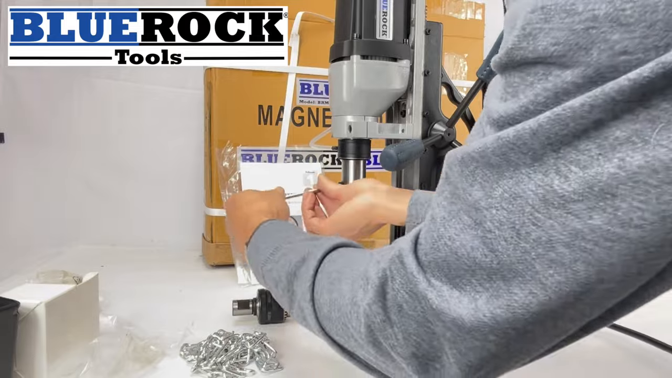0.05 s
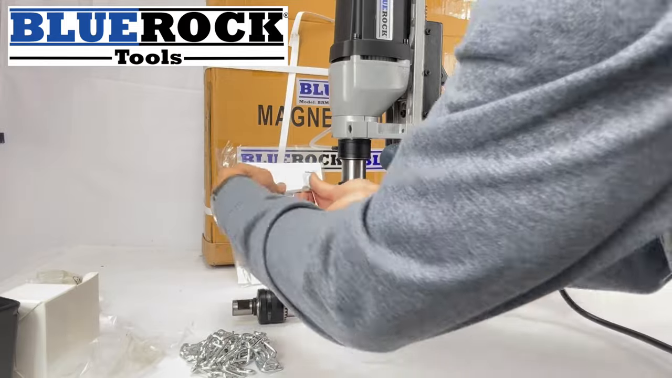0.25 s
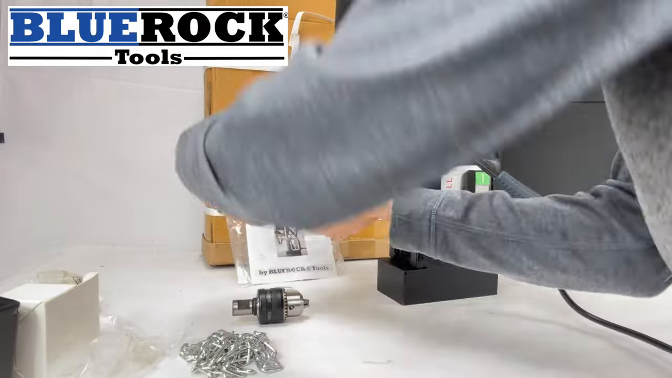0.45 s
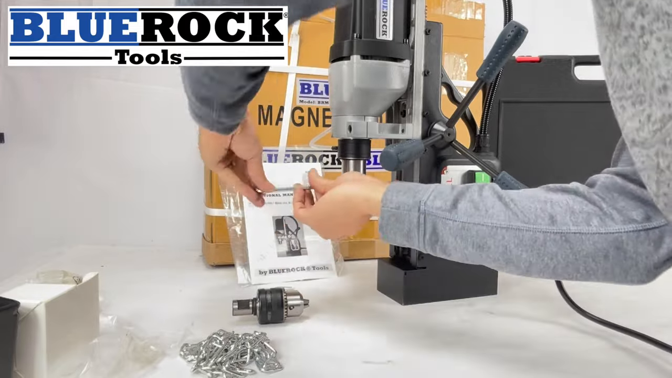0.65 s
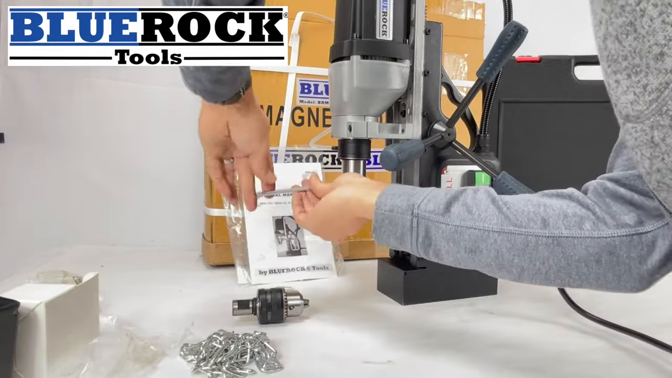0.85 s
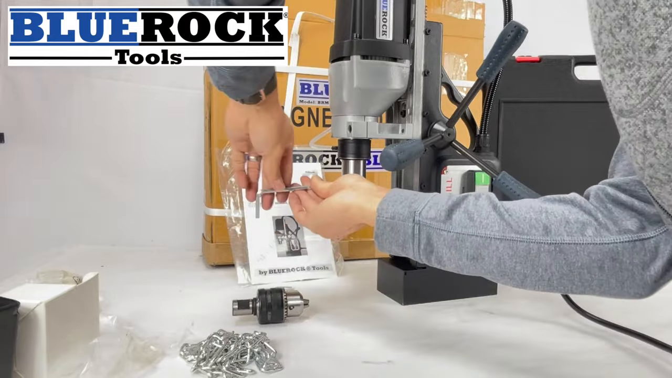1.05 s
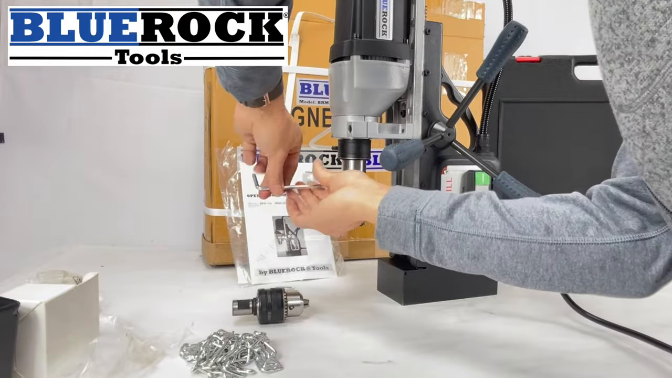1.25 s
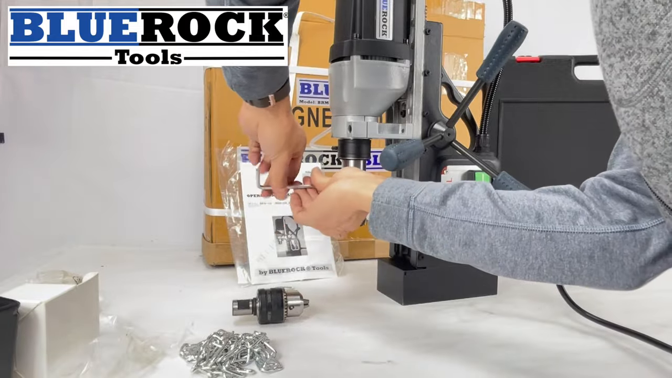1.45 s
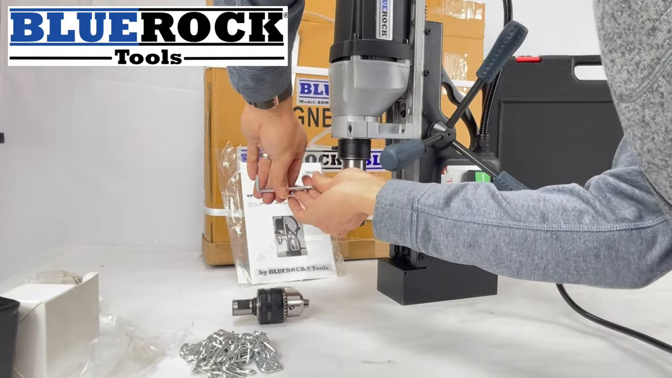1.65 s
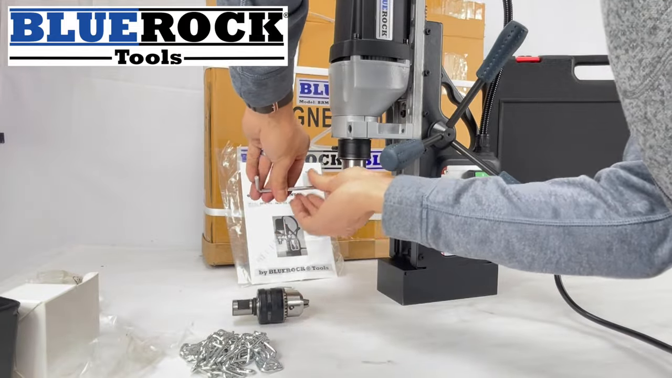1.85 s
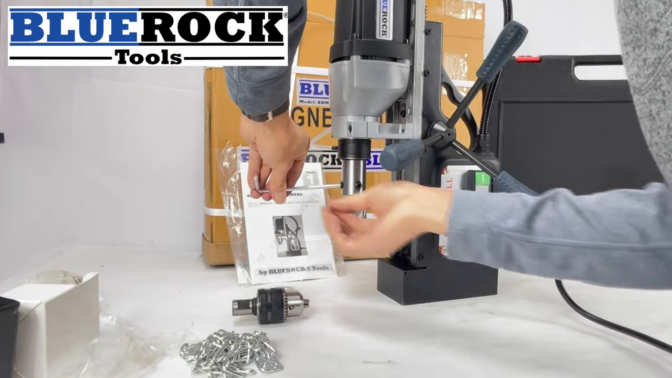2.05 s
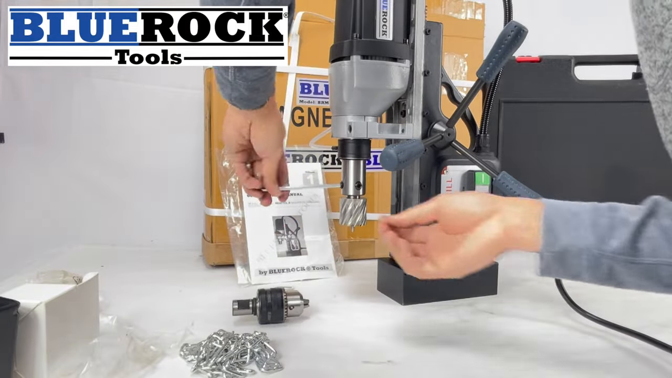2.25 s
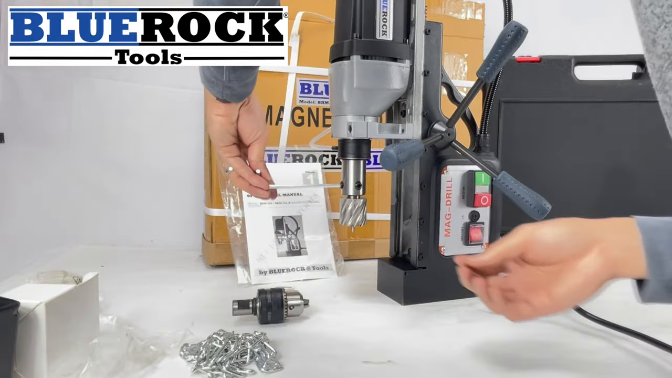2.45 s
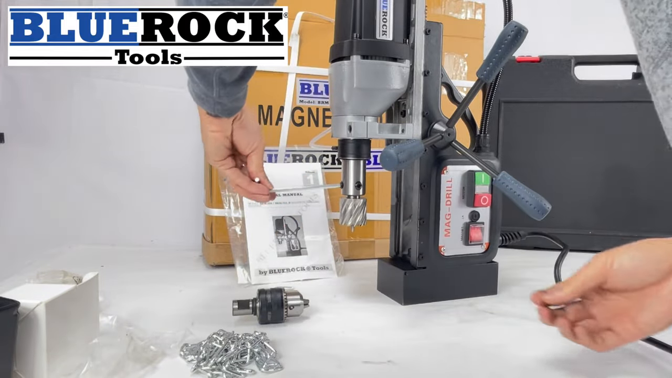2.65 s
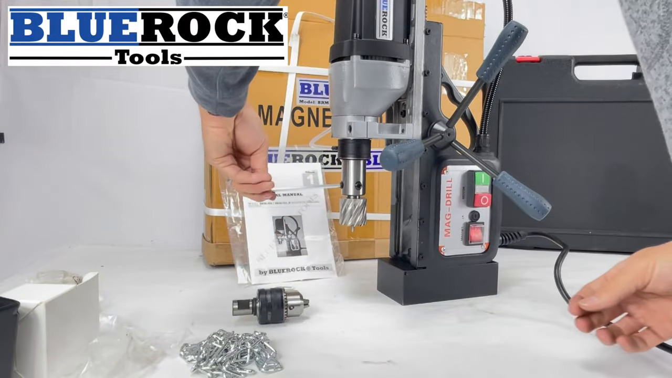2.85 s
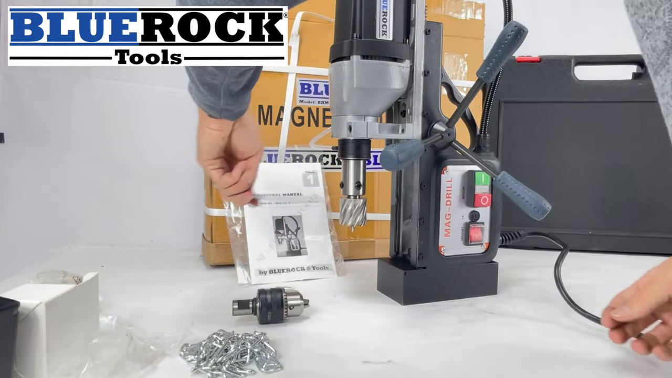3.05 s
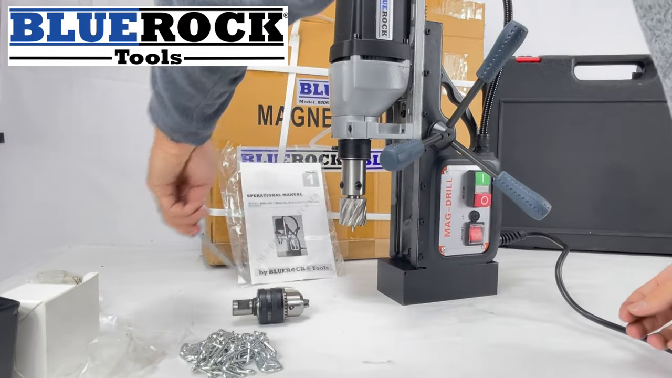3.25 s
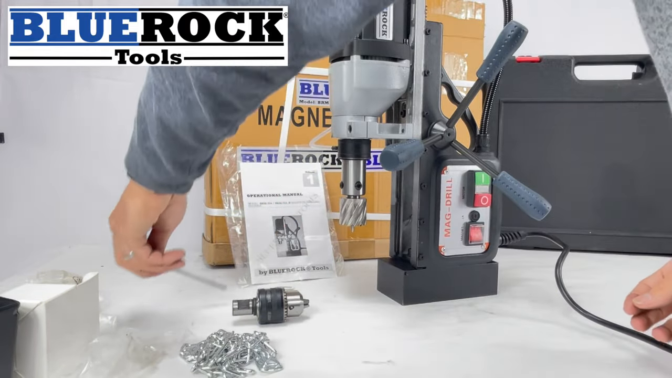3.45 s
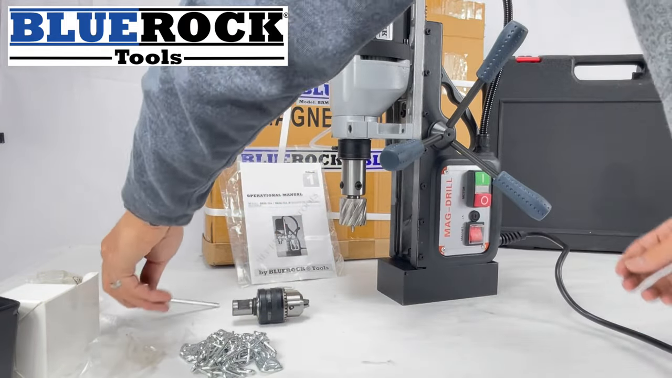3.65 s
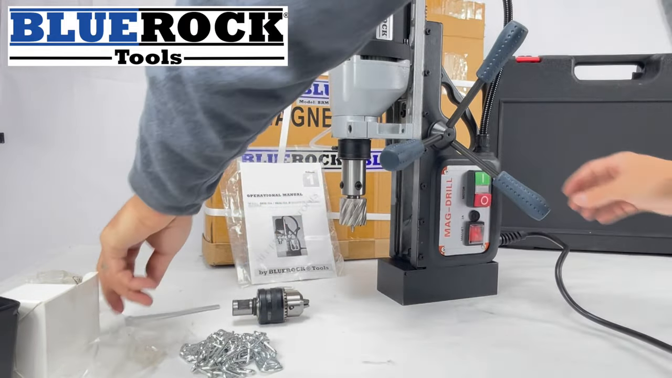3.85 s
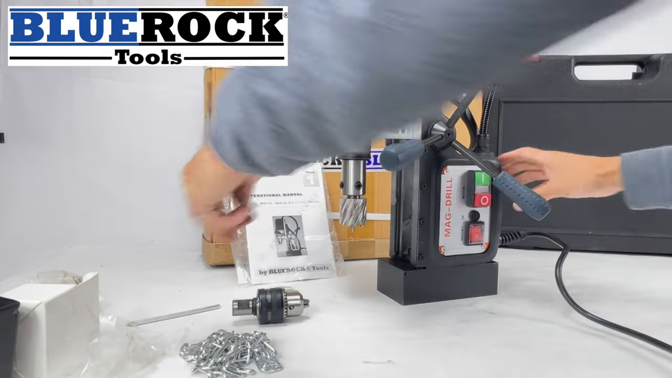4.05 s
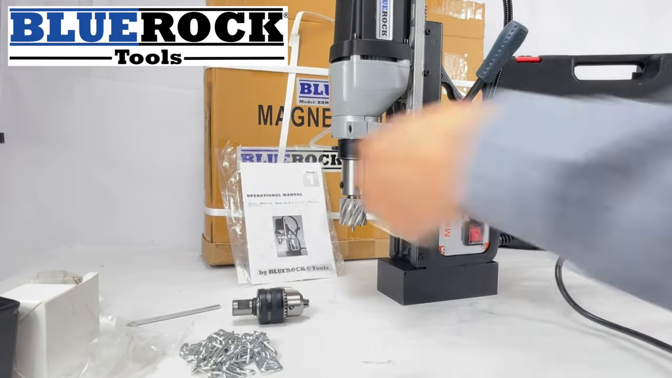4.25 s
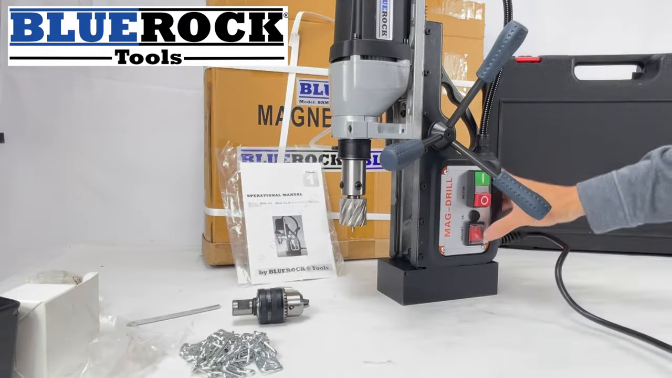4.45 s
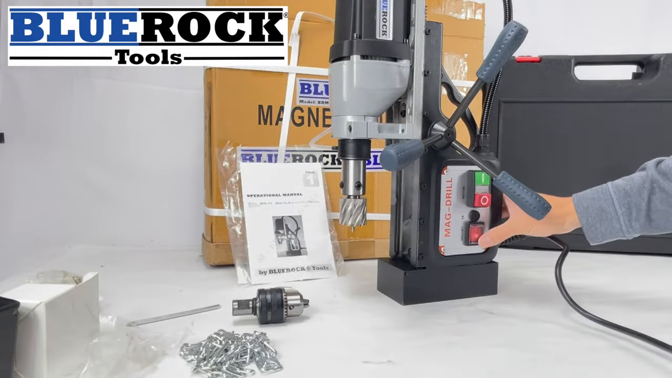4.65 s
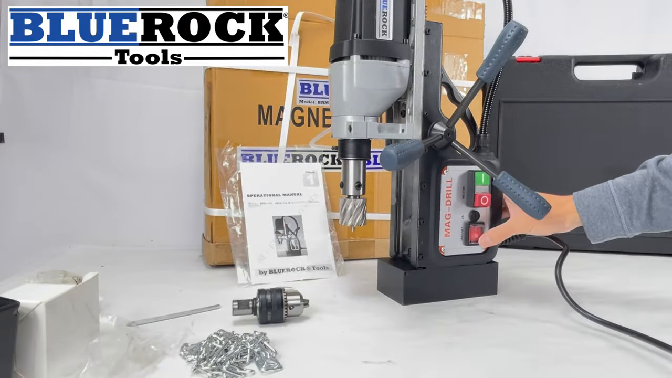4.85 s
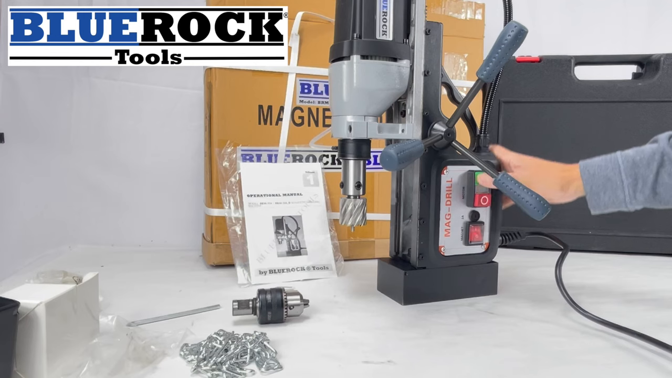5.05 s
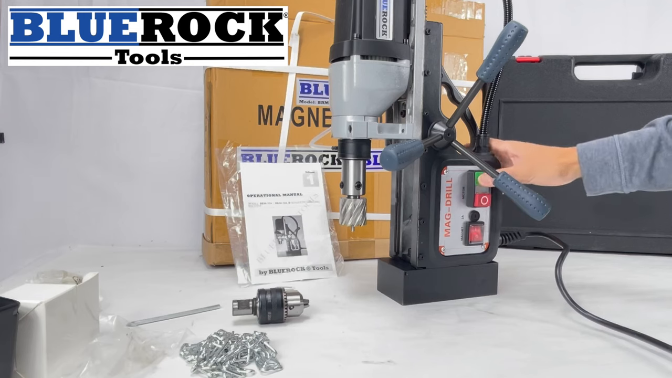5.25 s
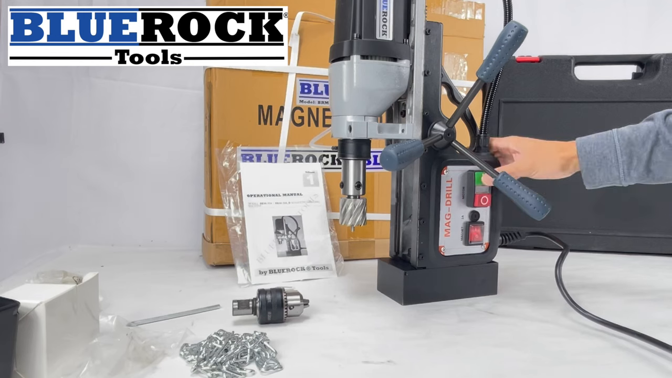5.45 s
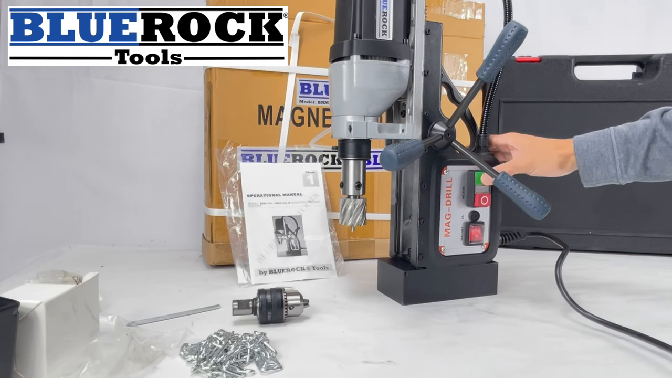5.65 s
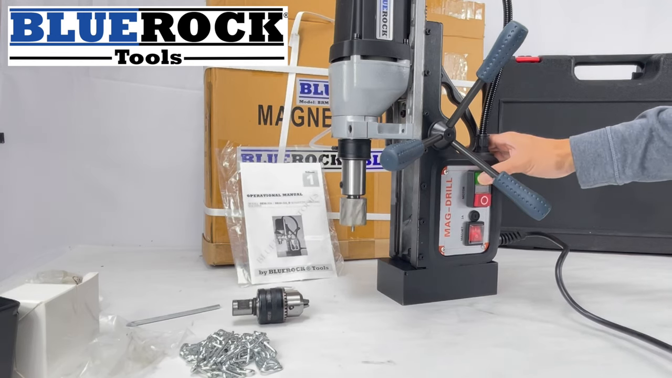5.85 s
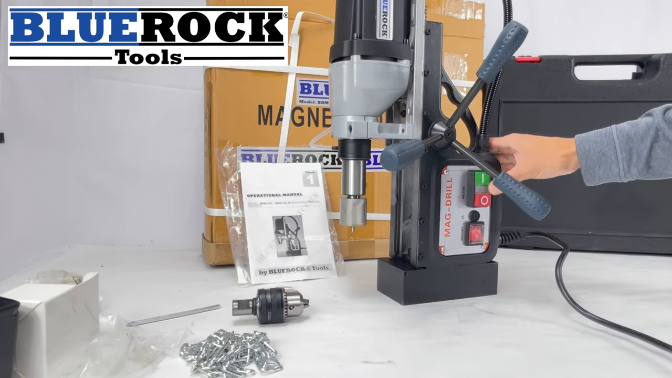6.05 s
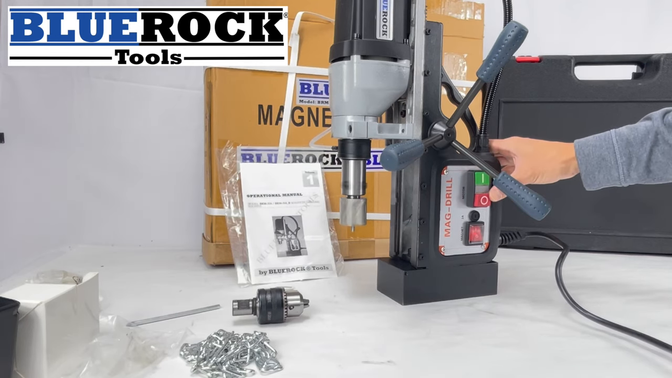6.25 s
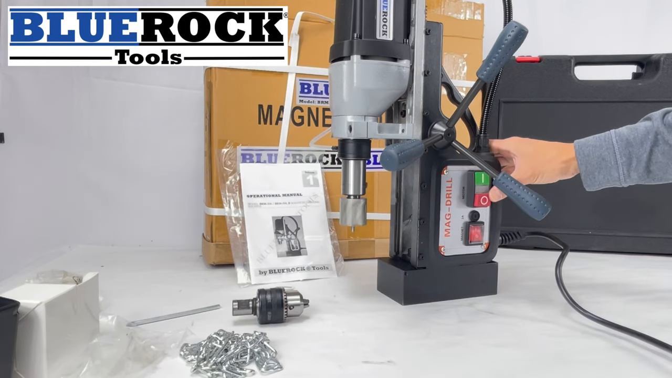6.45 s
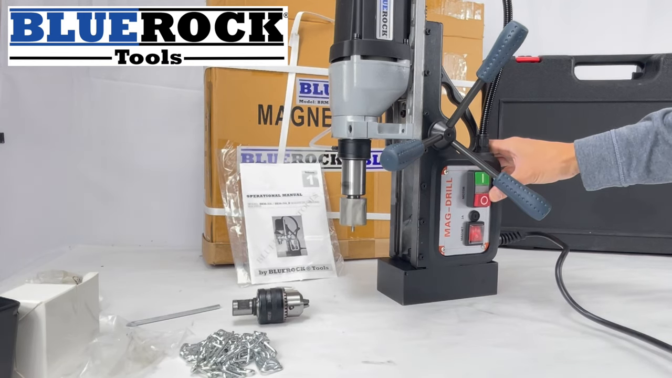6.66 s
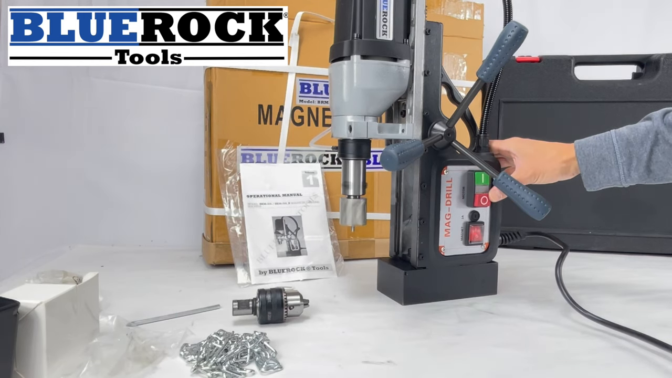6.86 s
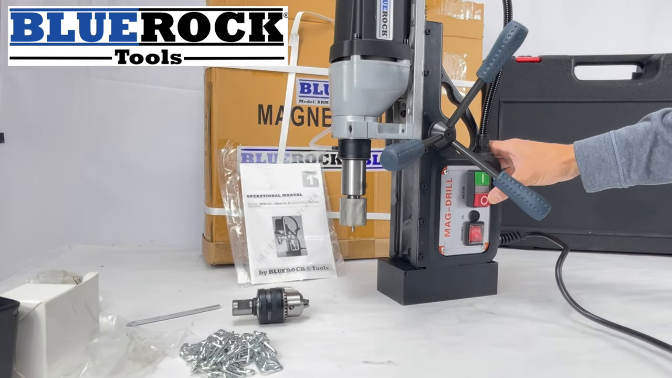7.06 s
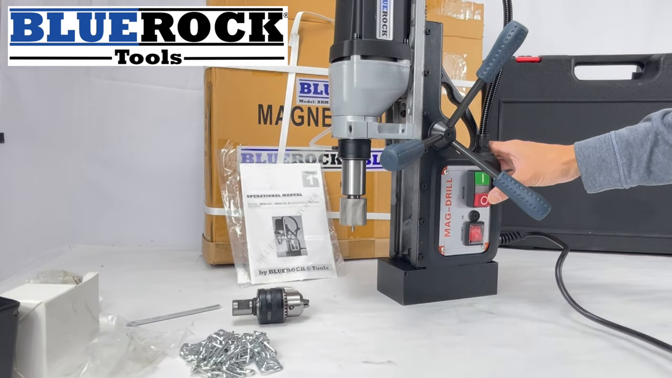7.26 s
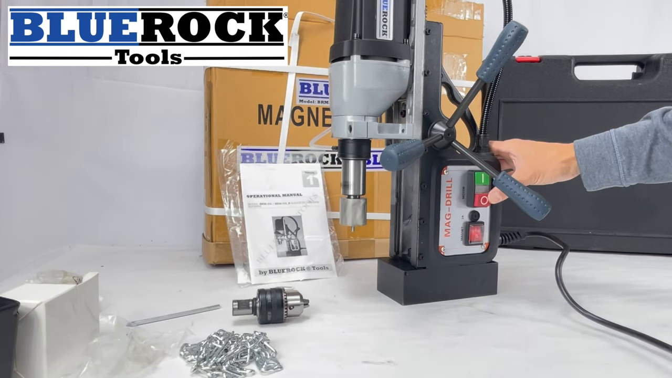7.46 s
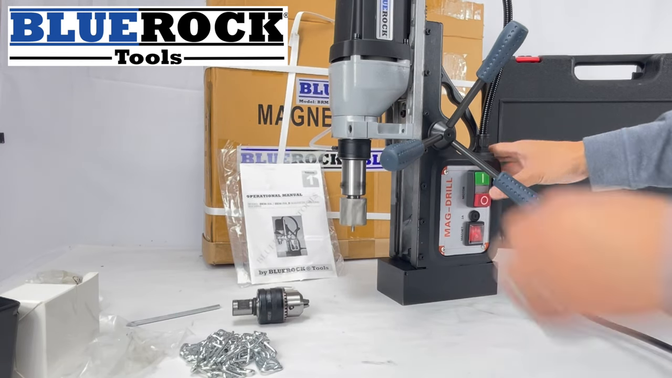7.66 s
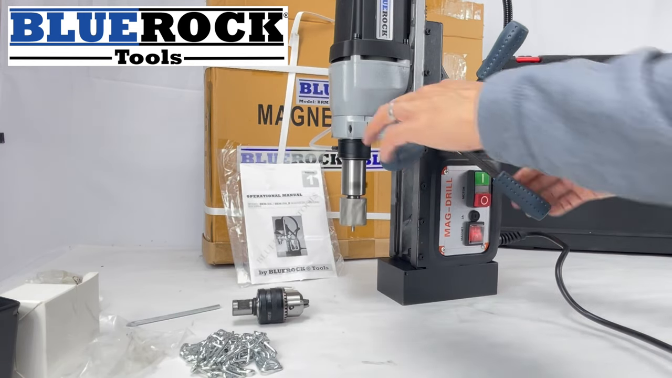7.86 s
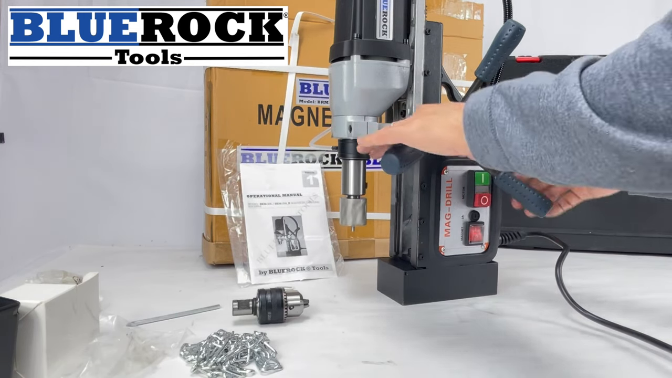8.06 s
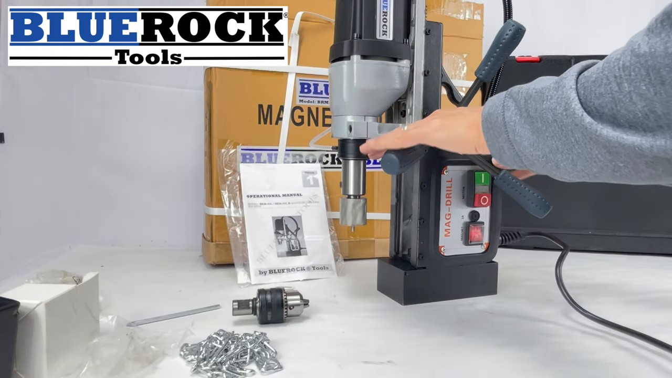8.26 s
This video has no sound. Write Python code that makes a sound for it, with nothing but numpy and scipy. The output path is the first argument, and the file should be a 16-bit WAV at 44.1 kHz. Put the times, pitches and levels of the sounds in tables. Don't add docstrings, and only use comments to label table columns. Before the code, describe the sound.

In a small quiet workshop, metal parts knock and click softly while fingers tap and sleeves rustle. A steel rod lands on the bench, bounces quickly and rings. More cloth brushing, a switch click, then a geared electric motor rattles, squeals upward and holds a loud, rough whine without cutting. Close stereo pickup at arm's length, with a short room tail.

```python
import sys
import numpy as np
from scipy import signal
from scipy.fft import rfft, irfft, next_fast_len
from scipy.io import wavfile

SR = 44100
rng = np.random.default_rng(int(sys.argv[2]) if len(sys.argv) > 2 else 0)


def undo_db(level):
    steps = np.asarray(level, float) / 20
    return 10 ** steps


def wav_record(signal):
    frames = np.transpose(np.atleast_2d(signal))
    bounded = np.clip(frames, -1, 1)
    quanta = np.round(bounded * 32767).astype(np.int16)
    wavfile.write(sys.argv[1], SR, quanta)


N = 366471

# f/Hz, likeness 0-1, left leads/rad
PORTS = [(60, .9, 0), (400, .7, -1), (1000, .5, .5), (2400, .55, -.7), (4000, .35, -2.3), (5500, .2, -3.5),
         (6900, .5, 0), (8600, .85, 3.1), (10300, .95, 6.1), (11600, .96, 6.5), (12400, .96, 9.2),
         (13800, .96, 9.8), (14600, .96, 12.5)]
# t/s, level over free running/dB
SHAKE = [(5.756, -29), (5.766, -1.5), (5.785, 2), (5.825, 7.5), (5.9, 1.8), (5.98, 4.5), (6.16, 5.5),
         (6.31, 5.5), (6.42, 4), (6.7, 3.5), (7.2, 1.5), (8.31, 0.85)]
SWITCH_ON_S, RUNNING_FROM_S = 5.7475, SHAKE[0][0]
FREE_SPEED, FULL_SPEED = 401.7, 440


def at_hz(points, hz, column=1):
    table = np.array(points)
    return np.interp(np.log(hz + 1), np.log(table[:, 0]), table[:, column])


def rms_one(x):
    return x / np.sqrt(np.mean(x ** 2) + 1e-20)


def band(x, low_hz, high_hz, order=2):
    sos = signal.butter(order, [low_hz, min(high_hz, .45 * SR)], "band", fs=SR, output="sos")
    return signal.sosfilt(sos, x)


def poles(hz, r):
    return [1, -2 * r * np.cos(2 * np.pi * hz / SR), r * r]


def drift(rate_hz, size=N):
    steps = rng.standard_normal(int(size / SR * 100) + 2)
    r = np.exp(-2 * np.pi * rate_hz / 100)
    slow = rms_one(signal.lfilter([1], [1, -r], steps))
    return np.interp(np.arange(size) / SR * 100, np.arange(len(steps)), slow)


def swells(events):
    t = np.arange(N) / SR
    return sum(undo_db(db) * np.exp(-((t - s) / half_s) ** 2) for s, half_s, db in events)


def stereo_spectra(alike, lead):
    left, own = rfft(rng.standard_normal((2, next_fast_len(N))))
    alike = np.clip(alike, 0, 1)
    right = alike * left * np.exp(-1j * lead) + np.sqrt(1 - alike ** 2) * own
    return np.array([left, right])


def coloured(points, alike):
    hz = np.fft.rfftfreq(next_fast_len(N), 1 / SR)
    inside = (hz > points[0][0]) & (hz < points[-1][0])
    spectra = stereo_spectra(alike, 0) * undo_db(at_hz(points, hz)) * inside
    return rms_one(irfft(spectra, next_fast_len(N))[:, :N])


def pan(x, db):
    return x * undo_db(np.array([[db / 2], [-db / 2]]))


def building_tone():
    # level/dB with the low cut in, then with it out
    cut_levels = [-84, -65, -64.5]
    open_levels = [-64, -62.5, -77.5]
    # t/s, half length/s, level/dB
    rumble_swells = [
        (1.0, 0.62, -77),
        (2.42, 0.25, -69),
        (3.5, 0.2, -78),
        (4.1, 0.21, -59),
        (5.4, 0.66, -57),
    ]
    # f/Hz, level/dB per Hz
    air_colour = [(75, -10.5), (128, -11), (167, -12.5), (313, -27.5), (488, -32), (1460, -66), (4000, -68),
                  (8000, -61), (12300, -52), (13500, -75), (15500, -75)]
    low_cut_out_s, jolt_db, jolt_t60_s = .78, -46.5, 0.93
    duck_db, duck_s = -4, 1
    hum_share, air_db = 0.49, -65.5

    t = np.arange(N) / SR
    age = np.maximum(t - RUNNING_FROM_S, 0)
    deep, hum, buzz = [undo_db(np.where(t < low_cut_out_s, cut, opened))
                       for cut, opened in zip(cut_levels, open_levels)]
    swell = 1 + swells(rumble_swells) / undo_db(open_levels[0]) * (t > low_cut_out_s)
    duck = undo_db(duck_db * (1 - np.exp(-age / duck_s)))
    jolt = undo_db(jolt_db - 60 * age / jolt_t60_s) * np.clip(age / 0.028, 0, 1)

    deep = (deep * swell * duck + jolt) * coloured([(28, -21.5), (54, 2), (80, -3.5)], alike=0.99)
    hum_tone = 1.34 * np.sin(2 * np.pi * 119.5 * t + 0.23 * drift(1.3))
    hum_noise = 0.35 * coloured([(90, -8), (118, 8.0), (150, -6.0)], alike=0.87)
    hum = (hum * swell ** hum_share * duck ** 3.0 + jolt) * (hum_tone + hum_noise)
    buzz = buzz * (t < RUNNING_FROM_S) * 1.82 * np.sin(2 * np.pi * 242 * t + 0.88 * drift(3.9))
    air = undo_db(air_db) * coloured(air_colour, alike=0.78)
    return pan(deep + hum + buzz, -1.4) + pan(air, -5.5)


def sleeves():
    # t/s, half length/s, level/dB
    moves = [
        (0, 0.084, -78),
        (.65, 0.23, -76.5),
        (1.2, 0.16, -85),
        (2.3, 0.22, -86),
        (3.95, 0.23, -72),
        (4.48, 0.19, -69.5),
        (5.05, 0.24, -79),
        (5.36, 0.12, -71.5),
        (5.74, 0.22, -76.5),
    ]
    # f/Hz, level/dB per Hz
    rustle_colour = [(210, -35), (350, 4.5), (500, 4.5), (1330, -1.5), (2400, -7.5), (6430, -14),
                     (7500, -19), (9750, -51)]
    # t/s, half length/s, level/dB
    slides = [
        (.05, 0.13, -94),
        (.55, .3, -88),
        (4.15, 0.2, -78.5),
        (4.48, 0.16, -78),
        (5.15, 0.35, -80),
    ]
    # f/Hz, level/dB per Hz
    slide_colour = [(7000, -20), (9500, 2), (11000, 8), (12500, 6), (15700, 0)]
    rest_db = -83.5
    before_start = np.arange(N) / SR < RUNNING_FROM_S
    brush = (undo_db(rest_db) + swells(moves)) * undo_db(1.3 * drift(23)) * before_start
    rustle = brush * coloured(rustle_colour, alike=0.022)
    rustle += swells(slides) * undo_db(1.5 * drift(15)) * coloured(slide_colour, alike=0.18)
    return pan(rustle, -5.5)


def touches(events, kind):
    # low f/Hz, high f/Hz, t60/s
    burst_bands = [(236, 614, 0.096), (800, 1170, 0.037), (1340, 3600, 0.024), (3330, 8100, 0.017)]
    directions = (1, -1, 1, -1)
    out, age = np.zeros((2, N)), np.arange(int(.2 * SR)) / SR
    thud_db, knock_db, pan_db = kind
    bursts = rng.standard_normal((len(events), len(age)))
    for (s, db, hard_db, bright_db), burst in zip(events, bursts):
        levels_db = db + np.array([thud_db, knock_db, hard_db, hard_db + bright_db])
        sound = undo_db(max(levels_db[2:]) - 60 * age / 0.0056) * band(burst, 2700, 16000)
        for level_db, way, (low, high, t60) in zip(levels_db, directions, burst_bands):
            sound += undo_db(level_db - 3.5 - 60 * age / t60) * rms_one(band(burst[::way], low, high))
        out[:, round(s * SR):][:, :len(age)] += pan(sound, pan_db)
    return out


def key_knocks():
    # t/s, body level/dB, hardness/dB, brightness/dB
    knocks = [(.006, -56.5, -19, 7), (.048, -45.5, -26, 25), (.203, -46, -5, -1), (.405, -58, -22, 8),
              (.777, -59.5, -6, 1), (.795, -68, -2, -12), (.885, -65, -17, -3), (.972, -60, -5, -7),
              (.993, -56, -28, -9), (1.036, -63, -21, -7), (1.165, -52, -17, -9), (1.215, -60, -23, -7),
              (1.261, -59, -30, -9), (1.386, -66, -17, -4), (1.676, -67, -20, -3), (3.811, -42, -9, -21),
              (5.674, -67, -12, -9)]
    kind = (-4, .1, -17)
    return touches(knocks, kind)


def finger_taps():
    # t/s, body level/dB, hardness/dB, brightness/dB
    taps = [(.02, -55, -14, 12), (.034, -72, -10, 7), (.69, -58, -12, -1), (.81, -77, -3, 2),
            (.281, -57, -22, -6), (.29, -45, -11, 0.5), (.624, -51.5, -21, 7), (.64, -56, -7, 4),
            (.748, -61.5, -1, 3), (1.438, -64.5, -3.5, 7), (1.447, -68, 4, -9), (1.459, -54, -15, -9),
            (2.573, -66.5, 5, -22), (2.601, -62, -2, -20), (2.992, -60, -10, -10), (3.013, -55.5, -8, -10),
            (3.074, -71, 5, -15), (3.219, -80, 13, -15), (3.787, -46, -4, -5), (3.878, -49.5, 13, -20),
            (3.889, -55, 3, -6), (3.925, -55, 7, -9), (3.951, -42.5, -16, 4), (5.755, -45.5, 15, 5.5),
            (5.765, -27.5, -21, -20)]
    kind = (.1, -29, -6.5)
    return touches(taps, kind)


def blows(events, modes, contact_s):
    at, out = [round(s * SR) for s, *_ in events], np.zeros(N)
    _, peak_db, _, weight_db = np.transpose(events)
    spread_db = rng.normal(0, 2.5, (len(events), len(modes)))
    for k, (hz, level_db, t60) in enumerate(modes):
        clicks = np.zeros(N)
        strike_db = peak_db + level_db - 4.0 + weight_db * (hz < 600) + spread_db[:, k]
        clicks[at] = (-1) ** k * undo_db(strike_db)
        feed = [0, np.sin(2 * np.pi * hz / SR)]
        ring = signal.lfilter(feed, poles(hz, undo_db(-60 / (t60 * SR))), clicks[:at[-1] + SR] + 1e-18)
        lag_s = rng.uniform(.4, 1) * contact_s * min(1, 700 / hz)
        out[:len(ring)] += np.roll(ring, int(lag_s * SR))
    age = np.arange(int(.04 * SR)) / SR
    cracks = rng.standard_normal((len(events), len(age)))
    for i, (_, db, hard_db, _), crack in zip(at, events, cracks):
        out[i - 100:][:len(age)] += undo_db(db + hard_db - 60 * age / 0.054) * band(crack, 1900, 12700)
    return out


def key_drops():
    # t/s, peak level/dB, hardness/dB, weight/dB
    drops = [
        (.204, -39.5, -26, 4),
        (.281, -45, -35, -0.5),
    ]
    # f/Hz, level/dB, t60/s
    spindle = [(554, -0.5, 0.077), (862, -13, .09), (980, -12, .1), (1320, -12, .06), (2720, -17, .08)]
    return pan(blows(drops, spindle, contact_s=0.0032), 1)


def screw():
    # t/s, peak level/dB, hardness/dB, weight/dB
    snaps = [
        (1.086, -72, -12, 0),
        (1.1055, -42, -40, 7),
        (1.108, -38.5, -40, 8.5),
        (2.134, -73, -12, 0),
        (2.162, -40, -31, 4.5),
        (2.1645, -39.5, -31, 10.5),
    ]
    # f/Hz, level/dB, t60/s
    arbor = [(406, -14, 0.045), (596, -7.5, 0.075), (760, -7, 0.028), (1370, 1, 0.022), (1820, 1, 0.012),
             (2160, 0.5, 0.0074), (2370, 3, 0.0059), (2660, 4, 0.012), (2860, 0, 0.0075), (3110, 4, 0.01),
             (3570, -1, 0.01), (4120, -11, 0.008), (4750, -13, 0.0079)]
    return pan(blows(snaps, arbor, contact_s=0.0027), -6.5)


def wrist():
    # t/s, peak level/dB, hardness/dB, weight/dB
    landings = [
        (2.989, -53.5, -45, 2),
        (3.016, -53, -45, 1),
    ]
    # f/Hz, level/dB, t60/s
    panel = [(302, 0.5, .12), (428, -4, .15), (521, -5, 0.12), (635, -6, 0.087)]
    return pan(blows(landings, panel, contact_s=0.00597), 1)


def rod_roll():
    # t/s, half length/s, level/dB
    rolls = [
        (3.80, .04, -67),
        (3.89, .04, -69),
        (3.96, 0.024, -74),
    ]
    ticks_per_s = 1500
    ticks = (rng.random(N) < ticks_per_s / SR) * rng.standard_normal(N)
    ticks *= undo_db(2.3 * np.minimum(rng.exponential(1, N), 3))
    return swells(rolls) * rms_one(band(ticks, 1400, 9000, order=1))


def steel_rod():
    # t/s, peak level/dB, hardness/dB, weight/dB
    bounces = [
        (3.515, -33.5, -16.5, -6),
        (3.749, -27, -16, 1),
        (3.848, -30, -20, -3.5),
        (3.878, -38.5, -18, -2),
        (3.907, -44, -5, 7),
    ]
    # f/Hz, level/dB, t60/s
    bench = [(284, 4, 0.088), (230.7, -5, 0.21), (342, -10, 0.062), (418, -6, 0.06), (487, -2, 0.06),
             (560, 3, 0.016), (675, -5, 0.016), (878, 9, 0.029), (943, 2, 0.03), (1063, 4.5, 0.038),
             (1320, 1, 0.034), (1486, -1, 0.016), (1685, -9, 0.076), (1950, -28, 0.021),
             (2650, -13.5, 0.026), (3070, -10, 0.0089), (3500, -28, 0.03), (4140, -37, 0.08)]
    return pan(blows(bounces, bench, contact_s=0.0035) + rod_roll(), -6.5)


def shop(x):
    tail_bands = [(152, 500, 0.43, -11), (450, 620, 0.34, -12), (775, 1070, 0.2, -8.5),
                  (1100, 1550, 0.16, -15.5), (1910, 5200, 0.17, -10.5), (4500, 20000, 0.25, -4)]
    age = np.arange(int(.6 * SR)) / SR
    white = rng.standard_normal((2, len(age)))
    tail = np.zeros((2, len(age)))
    for low, high, t60, db in tail_bands:
        unit_energy = np.sqrt(t60 * (high - low) / 7)
        tail += undo_db(db - 60 * age / t60) * band(white, low, high, order=1) / unit_energy
    tail *= np.clip(age / 0.0014, 0, 1)
    return signal.fftconvolve(x[None], tail * np.sqrt(.5), axes=1)[:, :N]


def armature():
    run_up = [
        (120, .053),
        (207, .2),
        (107, .6),
    ]
    age = np.maximum(np.arange(N) / SR - SWITCH_ON_S, 0)
    shortfall = sum(short * np.exp(-age / tau_s) for short, tau_s in run_up)
    return np.maximum(FREE_SPEED - shortfall, 5)


def shaken(free_db, share, power):
    t = np.arange(N) / SR
    shake_s, shake_db = np.transpose(SHAKE)
    gain = undo_db(free_db + share * np.interp(t, shake_s, shake_db))
    return gain * (armature() / FREE_SPEED) ** power * (t > RUNNING_FROM_S)


def stator_squeal(slot_phase, slot_hz, torque):
    hz, width_hz, squeal_db = 2033, 87, -7
    r = np.exp(-np.pi * width_hz / SR)
    force = undo_db(squeal_db) * 2 * torque * np.sin(slot_phase) / (1 + (1650 / slot_hz) ** 12)
    return pan(signal.lfilter([1 - r, 0, r - 1], poles(hz, r), force), 1.2)


def motor_tones():
    multiples = (1, 5, 7, 8, 10, 24, 12)
    # level between resonances/dB, lowest radiated f/Hz, highest f/Hz, left minus right/dB
    tone_rows = [(-43.5, 100, 900, -6), (-61, 170, 4000, -6), (-69, 1800, 2700, -9), (-58, 1500, 2850, 0),
                 (-43.5, 220, 3000, -2), (-74, 1600, 3800, 4), (-77, 790, 2900, -6)]
    # f/Hz, width/Hz, top rms level/dB
    tone_modes = [
        [(271, 6.4, -33), (335, 21.5, -29), (428, 110, -36.5)],
        [(446, 190, -34), (700, 100, -33.5), (1475, 40, -30.5), (1590, 80, -33.5), (1900, 120, -41),
         (1986, 27, -36.5)],
        [(2340, 130, -32)],
        [(2390, 80, -34), (2630, 140, -26.5), (2950, 300, -41)],
        [(1780, 92, -39), (2460, 280, -32.5), (2680, 270, -28), (3130, 220, -31)],
        [(2190, 170, -26), (2900, 120, -26)],
        [(1340, 330, -34.5), (2320, 120, -19), (2930, 230, -26.5)],
    ]
    # multiple of turn rate, rms level at full speed/dB, left minus right/dB
    fast_tones = [(5.138, -44, -2), (5.863, -44, 2), (6, -38, 3), (6.075, -46, 0), (12, -37, 0),
                  (20, -43, 0), (24, -46, 0), (25, -52, 0), (39, -53, 0), (40, -46, 0)]
    ripple_hz, speed_jitter = 120, 0.11

    on = round(RUNNING_FROM_S * SR)
    speed, t = armature()[on:], np.arange(on, N) / SR
    turns = np.cumsum(speed) / SR
    strain = np.clip(1 - speed / FULL_SPEED, 0, 1)
    tones = []
    for k, (floor_db, cut_hz, top_hz, pan_db), modes in zip(multiples, tone_rows, tone_modes):
        tone_hz = k * speed
        power = sum(undo_db(2 * db) / (1 + (2 * (tone_hz - hz) / width_hz) ** 2) for hz, width_hz, db in modes)
        gain = np.sqrt(undo_db(2 * floor_db) + power / (1 + (tone_hz / top_hz) ** 12))
        tones.append((k, gain / (1 + (cut_hz / tone_hz) ** 12), pan_db))
    tones += [(k, undo_db(db) * (speed / FULL_SPEED) ** 3, pan_db) for k, db, pan_db in fast_tones]

    out = np.zeros((2, N - on))
    for j, (k, gain, pan_db) in enumerate(tones):
        throb = 1 + 1.8 * strain * (k > 1) * np.cos(2 * np.pi * ripple_hz * t + 1.44)
        wobble = undo_db(1.67 * drift(4.5, size=N - on))
        lead = at_hz(PORTS, k * speed, column=2) * np.array([[.5], [-.5]])
        jitter = (0.19 + speed_jitter * k * (1 - speed / FREE_SPEED)) * drift(36, size=N - on)
        phase = 2 * np.pi * k * turns + jitter + lead
        out += pan(np.sqrt(2) * gain * throb * wobble * np.sin(phase), pan_db)
        if j == len(tone_rows) - 1:
            out += stator_squeal(phase, k * speed, strain * throb)
    return np.pad(out, ((0, 0), (on, 0)))


def motor_roar():
    split_hz = [1200, 3500, 7500]
    # f/Hz, level/dB per Hz
    roar_colour = [(60, -35), (150, -24), (300, -13.5), (700, -5.5), (1100, -9), (2200, 4), (4200, -2),
                   (6800, -3), (7400, -8), (9000, -7), (10000, -13), (12500, -17), (15700, -16)]
    # f/Hz, left minus right/dB
    roar_pan = [(60, 8), (110, -3), (200, 1.5), (380, -3), (700, 8.5), (1290, 2.5), (2380, 3.5), (4400, -6),
                (5500, -8), (7000, -4), (8120, -5), (10000, -6), (15000, 3.5)]
    # f/Hz, width/Hz, left lift/dB, right lift/dB
    housing = [(625, 48, -11.5, 9.5), (917, 200, 2, 15), (1442, 560, 4.5, 11.5), (1735, 78, -14, 3.5),
               (1600, 130, 3, -5), (2620, 98, -3, 2), (3400, 290, -3.5, 0), (2410, 170, -5.5, -7),
               (2356, 116, 7, 11), (3020, 85, 3, 8), (3760, 250, 4.5, 3.5), (6900, 250, 2, 4),
               (7100, 200, 0, -3), (7750, 300, 3, 0), (8050, 200, -2, -3), (8550, 300, 2, 3),
               (9030, 180, -2, -4), (9330, 300, 6, 3), (10200, 300, -2, -2), (4810, 1130, 6, 4.5),
               (5430, 83, -7, 3.5), (6250, 360, 5.5, 6), (10730, 250, -2, 7.5), (12000, 280, 11, 7),
               (13040, 310, 11.5, 13), (15700, 270, 0, 2), (1000, 190, -2, -1.5), (755, 45, -0.5, 5.5),
               (2200, 94, -3.5, -11), (2900, 45, 7, -11), (4030, 93, 1, -3.5), (5325, 94, -1, 5),
               (5500, 150, -7, -7.5)]
    layers = [
        (-33, 1.73, 1.3),
        (-31.5, 0.69, 0.011),
        (-28.5, 1.56, 1.35),
        (-28, 1.34, 1.69),
    ]
    beat_depths, flicker_db = (0.025, 0.051, 0.033, .05), (0.096, 0.52, 0.8, 0.63)
    comb_db, comb_hz = 2.0, 28

    hz = np.fft.rfftfreq(next_fast_len(N), 1 / SR)
    colour_db = at_hz(roar_colour, hz) + at_hz(roar_pan, hz) * np.array([[.5], [-.5]])
    for centre_hz, width_hz, *lift_db in housing:
        colour_db = colour_db + np.array(lift_db)[:, None] / (1 + (2 * (hz - centre_hz) / width_hz) ** 2)
    nodes = np.arange(0, SR / 2 + comb_hz, comb_hz)
    colour_db = colour_db + [np.interp(hz, nodes, comb_db * rng.standard_normal(len(nodes)))
                             for port in range(2)]
    spectra = stereo_spectra(at_hz(PORTS, hz), at_hz(PORTS, hz, column=2)) * undo_db(colour_db)
    below = [0] + [1 / (1 + (hz / edge) ** 8) for edge in split_hz] + [1]
    turns = np.cumsum(armature()) / SR
    out = np.zeros((2, N))
    for k, layer in enumerate(layers):
        beat = 1 + beat_depths[k] * np.cos(2 * np.pi * turns)
        noise = rms_one(irfft(spectra * (below[k + 1] - below[k]), next_fast_len(N))[:, :N])
        out += noise * beat * shaken(*layer) * undo_db(flicker_db[k] * drift(9.4))
    return out


def gear_knock():
    # f/Hz, width/Hz, level/dB
    gearbox = [(487, 96, 0), (780, 63, -2.5), (850, 200, -1), (1470, 33, -17), (1978, 39, -1.5),
               (2230, 38, -24), (2437, 93, 9.5), (2685, 103, 13.5), (2846, 74, -3)]
    knock_layer = (-45.5, 2.42, -0.26)
    turns = np.cumsum(armature()) / SR
    knocks = np.diff(np.floor(turns + .14 * drift(46)), prepend=0)
    knocks = knocks * undo_db(1.7 * rng.standard_normal(N) + 2.2 * drift(25))
    out = np.zeros((2, N))
    for k, (hz, width_hz, db) in enumerate(gearbox):
        ring = signal.lfilter([1, 0, -1], poles(hz, np.exp(-np.pi * width_hz / SR)), knocks)
        out += pan((-1) ** k * undo_db(db + 2.3 * drift(12)) * ring, rng.normal(-2.2, 9.3))
    return rms_one(out) * shaken(*knock_layer)


def take_up():
    # t/s, f/Hz, peak level/dB, half length/s
    rings = [
        (5.782, 2084, -25, 0.0055),
        (5.789, 760, -23.5, 0.0042),
        (5.798, 2230, -17, 0.0041),
        (5.812, 1516, -31, .008),
        (5.822, 2900, -17.5, 0.0057),
        (5.84, 780, -27, 0.0054),
    ]
    near = slice(round(5.7 * SR), round(5.95 * SR))
    t = np.arange(N)[near] / SR
    out = np.zeros(N)
    for s, hz, db, half_s in rings:
        out[near] += undo_db(db) * np.exp(-((t - s) / half_s) ** 2) * np.sin(2 * np.pi * hz * t)
    return pan(out, -1.5)


def scene():
    hands = key_knocks() + finger_taps() + key_drops() + screw() + wrist() + steel_rod()
    hands[0] = np.roll(hands[0], 20)
    tail = undo_db(-4) * shop(hands.mean(axis=0))
    motor = motor_tones() + motor_roar() + gear_knock() + take_up()
    return building_tone() + sleeves() + hands + tail + motor


def emptied(x, gaps):
    from_s = .78
    hz, s, frames = signal.stft(x, SR, nperseg=2048)
    count = frames.shape[1]
    for low, high, wander in gaps:
        draws = rng.standard_normal((2, count // 3 + 1))
        shift = wander * np.repeat(draws, 3, axis=1)[:, :count]
        inside = (hz[:, None] > low + shift[0]) & (hz[:, None] < high + shift[1])
        frames[(s > from_s) & inside] = 0
    return signal.istft(frames, SR, nperseg=2048)[1][:N]


def roll_off(x):
    return signal.sosfilt(signal.butter(12, 16970, fs=SR, output="sos"), x)


def record(dry):
    # low f/Hz, high f/Hz, edge wander/Hz
    mid_gaps = [(7850, 8050, 170), (8450, 8500, 150), (9000, 9100, 100), (12400, 13950, 220),
                (15740, 23000, 30)]
    side_gaps = [(10150, 11700, 170), (14550, 23000, 260)]
    mid = emptied(dry.mean(axis=0), mid_gaps)
    side = emptied((dry[0] - dry[1]) / 2, side_gaps)
    mix = np.array([mid + side, mid - side])
    return roll_off(mix)


dry = scene()
out = record(dry)
wav_record(out)
```